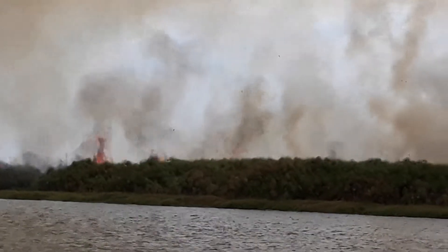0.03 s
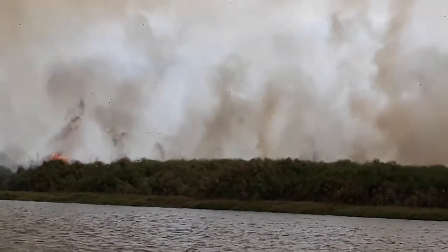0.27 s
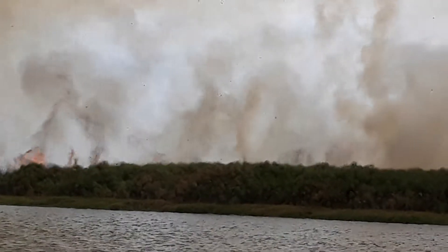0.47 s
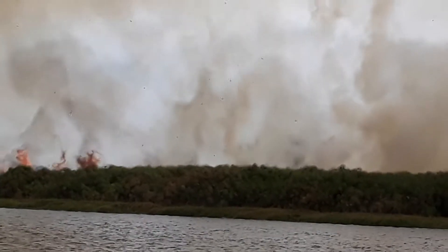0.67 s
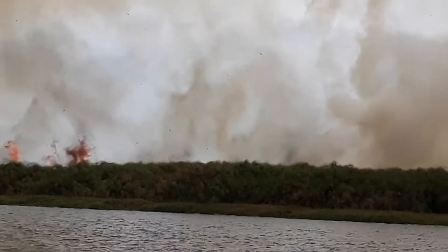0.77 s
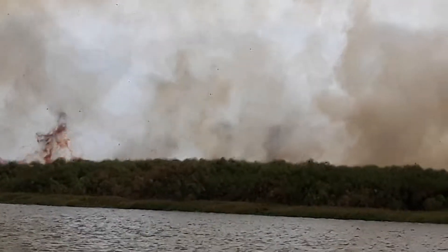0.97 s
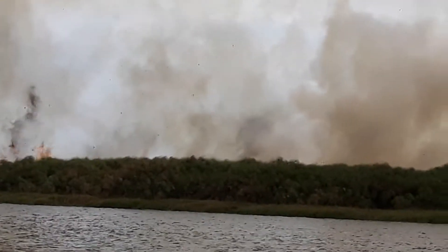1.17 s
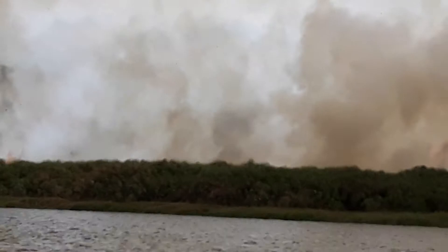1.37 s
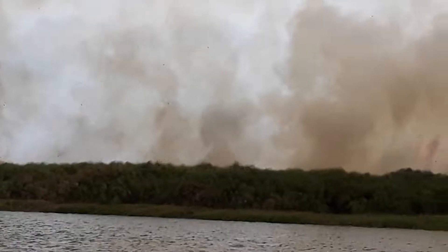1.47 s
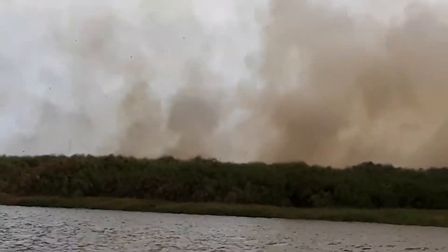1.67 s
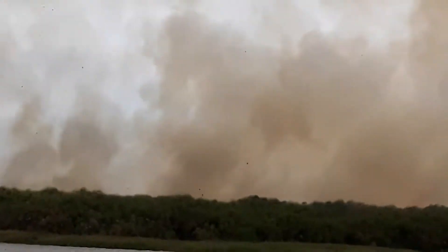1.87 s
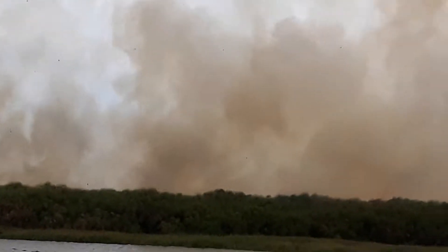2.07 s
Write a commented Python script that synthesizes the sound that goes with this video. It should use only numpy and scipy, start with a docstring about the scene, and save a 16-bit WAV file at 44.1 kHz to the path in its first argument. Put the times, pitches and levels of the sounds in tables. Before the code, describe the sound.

Wind buffets the microphone closely, starting low, then thumping hardest from about 0.2 to 0.55 seconds in a dense cluster of blunt pops. Looser thuds and low flutter continue, with another strong burst near 1.4 to 1.6 seconds, easing after 1.75 with a small flutter at 2.0. Throughout, a distant reed fire sizzles faintly across water, dense and dull; a barely audible high tick falls near 1.7.

```python
"""Wind buffets the microphone close up: short gusts of eddies pop and thump over a low flutter.
Each gust is a train of rounded pressure pulses; the flutter is coloured random impulses.
Far behind, a reed bed burns across water: smeared random cracks and noise merge into a sizzle,
dulled by distance. One faint high tick is a fading band of noise."""
import sys
import numpy as np
from scipy import signal
from scipy.fft import rfft, irfft
from scipy.io import wavfile
from scipy.ndimage import uniform_filter1d, minimum_filter1d

SR = 44100
rng = np.random.default_rng(int(sys.argv[2]) if len(sys.argv) > 2 else 0)


def generate_wav(sig):
    """Save sig (samples, or channels by samples) to the path in sys.argv[1] as 16-bit PCM at SR."""
    pcm = np.round(np.clip(np.atleast_2d(sig).T, -1, 1) * 32767).astype(np.int16)
    wavfile.write(sys.argv[1], SR, pcm)


N = 93051


def undb(db):
    """Decibels to amplitude gain."""
    return 10 ** (np.asarray(db) / 20)


def unit(x):
    """Scale to rms 1."""
    return x / np.sqrt(np.mean(x ** 2) + 1e-18)


def curve(rows):
    """Join (time_s, value) rows by straight lines."""
    time_s, value = np.array(rows).T
    return np.interp(np.arange(N) / SR, time_s, value)


def colour(x, points):
    """Shape a spectrum by (freq_hz, density_db) points, straight over log frequency; rms 1."""
    freq_hz, density_db = np.array(points).T
    bin_hz = np.maximum(np.fft.rfftfreq(N, 1 / SR), 1)
    gain_db = np.interp(np.log(bin_hz), np.log(freq_hz), density_db)
    return unit(irfft(rfft(x) * undb(gain_db), N))


def walk(rate_hz):
    """Random levels held 1 / rate_hz and smoothed twice; rms 1."""
    hold = max(int(SR / rate_hz), 2)
    steps = np.repeat(rng.standard_normal(N // hold + 1), hold)
    smooth = uniform_filter1d(uniform_filter1d(steps, hold), hold)
    return unit(smooth)[:N]


PORT_HZ, PORT_Q = 96, 0.71


def port(x):
    """Two-pole bass roll-off of the microphone."""
    g = np.pi * PORT_HZ / SR
    poles = [1 + g / PORT_Q + g * g, 2 * (g * g - 1), 1 - g / PORT_Q + g * g]
    return signal.lfilter([1, -2, 1], poles, x)


EDDIES_PER_CYCLE = 1.7  # eddy rate / cut-off: fast air brings more eddies
EDDY_SPREAD_OCT, EDDY_SCATTER_DB = .15, 3.5  # standard deviations of pulse width and strength
EDDY_SHARPNESS = 1  # exponent of the pulse shape
EDDY_BASS_SHARE = 0.35  # high-pass corner / cut-off
GUST_EDGE = 3.5  # steepness of rise and fall


def gust(t, length_s, cutoff_hz, count=120):
    """Train of eddies, each a rounded pressure pulse that pushes or pulls; starts and stops abruptly."""
    slip, turn = rng.random((2, count))
    scale, strength = rng.standard_normal((2, count))
    when_s = (np.arange(count) - count / 2 + slip) / (EDDIES_PER_CYCLE * cutoff_hz)
    width_s = 2 ** (EDDY_SPREAD_OCT * scale) / (2 * np.pi * cutoff_hz)
    swell = 1 / np.sqrt(1 + np.abs(2 * when_s / length_s) ** (2 * GUST_EDGE))
    push = np.sign(turn - .5) * undb(EDDY_SCATTER_DB * strength) * swell
    near = np.abs(when_s) < length_s + 1 / cutoff_hz
    age = (t - when_s[near, None]) / width_s[near, None]
    pulses = push[near] @ (1 + age ** 2) ** -EDDY_SHARPNESS
    bass_pole = np.exp(-2 * np.pi * EDDY_BASS_SHARE * cutoff_hz / SR)
    x = signal.lfilter([1, -1], [1, -bass_pole], pulses)
    x = port(x) * signal.windows.tukey(len(t), .5)
    # total energy as of rms 1 over length_s
    return x * np.sqrt(length_s * SR / (np.sum(x ** 2) + 1e-18))


# gusts on the microphone; fast air makes small, bright eddies
# [centre_s, length_s, relative_level_db, eddy_cutoff_hz]
GUST_TABLE = [(0.02, 0.03, -20, 130), (0.118, 0.011, -15, 300), (0.143, 0.009, -15, 410),
              (0.238, 0.014, -7, 490), (0.246, 0.029, -9, 160), (0.288, 0.008, -15, 280),
              (0.323, 0.006, -10, 330), (0.346, 0.024, -13, 370), (0.368, 0.006, -9, 320),
              (0.374, 0.005, -10, 520), (0.386, 0.008, -11, 410), (0.418, 0.033, -13, 410),
              (0.445, 0.012, -18, 350), (0.473, 0.007, -9, 470), (0.493, 0.006, -16, 230),
              (0.519, 0.009, -12, 410), (0.538, 0.018, -17, 430), (0.599, 0.006, -18, 490),
              (0.622, 0.014, -21, 290), (0.661, 0.013, -17, 370), (0.685, 0.012, -15, 340),
              (0.74, 0.013, -14, 460), (0.779, 0.009, -15, 300), (0.794, 0.009, -16, 500),
              (0.807, 0.006, -12, 410), (0.824, 0.014, -18, 310), (0.921, 0.018, -21, 370),
              (0.939, 0.007, -12, 420), (0.949, 0.02, -15, 380), (0.992, 0.009, -15, 390),
              (1.077, 0.012, -15, 170), (1.171, 0.006, -18, 510), (1.188, 0.014, -15, 290),
              (1.22, 0.012, -14, 310), (1.278, 0.011, -12, 330), (1.296, 0.022, -20, 380),
              (1.328, 0.005, -21, 440), (1.359, 0.008, -14, 450), (1.385, 0.018, -15, 300),
              (1.426, 0.004, -12, 560), (1.438, 0.009, -9, 460), (1.45, 0.006, -8, 580),
              (1.463, 0.018, -11, 210), (1.492, 0.014, -15, 310), (1.503, 0.004, -16, 500),
              (1.573, 0.009, -16, 430), (1.586, 0.005, -12, 610), (1.6, 0.013, -10, 450),
              (1.624, 0.026, -16, 320), (1.692, 0.009, -17, 370), (1.728, 0.012, -15, 300),
              (1.745, 0.008, -17, 320), (1.996, 0.016, -17, 210), (2.028, 0.011, -18, 370)]
GUST_DB = 1  # added to every gust


def gusts(size=6144):
    """Sum the bursts of eddies, each centred on its moment."""
    out = np.zeros(N + 2 * size)
    t = (np.arange(size) - size // 2) / SR
    for centre_s, length_s, level_db, cutoff_hz in GUST_TABLE:
        start = int(centre_s * SR) + size // 2
        out[start:start + size] += undb(level_db + GUST_DB) * gust(t, length_s, cutoff_hz)
    return out[size:size + N]


# breeze between the gusts [time_s, level_db]
BREEZE_LEVEL = [(0, -30.5), (.08, -24), (.35, -17), (.55, -17.5), (.7, -28), (.85, -21.5), (1.15, -21),
                (1.5, -22), (1.75, -21.5), (1.87, -32), (2, -23), (2.11, -35.5)]
# relative spectral density of the breeze [freq_hz, density_db]
BREEZE_SPECTRUM = [(20, -36), (45, -13), (90, 3.5), (160, 5), (300, 1.5), (500, -11.5), (900, -22),
                   (2000, -75)]
BREEZE_EDDIES_PER_S, BREEZE_SCATTER_DB = 700, 3.5


def breeze():
    """Large slow eddies arrive at random and keep up a low flutter."""
    arrivals = rng.random(N) < BREEZE_EDDIES_PER_S / SR
    strength = undb(BREEZE_SCATTER_DB * rng.standard_normal(N))
    eddies = arrivals * rng.choice([-1, 1], N) * strength
    return colour(eddies, BREEZE_SPECTRUM) * undb(curve(BREEZE_LEVEL))


# relative spectral density of the distant fire [freq_hz, density_db]
FIRE_SPECTRUM = [(200, -0.5), (900, -2.5), (1800, 3.5), (2500, -1), (3200, -5), (4800, -13.5),
                 (6200, -27.5), (8500, -31.5), (9300, -52.5), (15500, -54)]
# fire level before flaring [time_s, level_db]
FIRE_LEVEL_CURVE = [(0, -43.5), (.5, -45), (1, -45.5), (1.5, -43.5), (1.75, -45.5), (1.9, -47.5),
                    (2.11, -46.5)]
CRACKS_PER_S, CRACK_SCATTER_DB = 3000, 3.0
CRACK_DB, ROAR_DB = -7.5, -4.5  # mix before colouring
FLARE_HZ, FLARE_DB = 25, 0.83  # rate and rms of level changes
SCATTER_S, SCATTER_SHARE = .004, 0.64  # reeds and water smear each crack


def fire():
    """Bursting stems: dense smeared cracks over the rush of the flames, flaring quickly."""
    cracks = (rng.random(N) < CRACKS_PER_S / SR) * rng.choice([-1, 1], N)
    cracks = cracks * undb(CRACK_SCATTER_DB * np.minimum(rng.exponential(size=N), 6))
    tail = rng.standard_normal(N) * np.exp(-np.arange(N) / SR / SCATTER_S)
    smear = signal.fftconvolve(cracks, tail / np.linalg.norm(tail))[:N]
    cracks = cracks + SCATTER_SHARE * smear
    roar = rng.standard_normal(N)
    blaze = undb(CRACK_DB) * unit(cracks) + undb(ROAR_DB) * roar
    level_db = curve(FIRE_LEVEL_CURVE) + FLARE_DB * walk(FLARE_HZ)
    return colour(blaze, FIRE_SPECTRUM) * undb(level_db)


# one faint high tick [start_s, decay_s, centre_hz, width_hz, onset_level_db]
TICK_SETTINGS = (1.716, .018, 8300, 1100, -61)


def tick():
    """Thin high tick: band-passed noise under an exponential decay."""
    start_s, decay_s, centre_hz, width_hz, level_db = TICK_SETTINGS
    age_s = np.arange(N) / SR - start_s
    edges_hz = [centre_hz - width_hz / 2, centre_hz + width_hz / 2]
    band = signal.butter(1, edges_hz, "band", fs=SR, output="sos")
    hiss = unit(signal.sosfilt(band, rng.standard_normal(N)))
    return undb(level_db) * hiss * (age_s > 0) * np.exp(-np.abs(age_s) / decay_s)


def scene():
    """Wind at the microphone in front of the distant fire."""
    return (gusts() + breeze() + fire() + tick())[None]


FADE_S, TOP_HZ = .008, 15700


def record(dry):
    """Quick limiter holds the strongest gusts to full scale; the sound fades in and the top is cut."""
    size = 128  # smoothing window, samples
    gain = minimum_filter1d(1 / np.maximum(np.abs(dry), 1), 2 * size)
    gain = uniform_filter1d(uniform_filter1d(gain, size), size)
    fade = np.sin(np.pi / 2 * np.minimum(np.arange(N) / SR / FADE_S, 1)) ** 2
    top_cut = signal.ellip(8, .2, 70, TOP_HZ, fs=SR, output="sos")
    return signal.sosfilt(top_cut, dry * gain * fade)


dry = scene()
out = record(dry)
generate_wav(out)
```